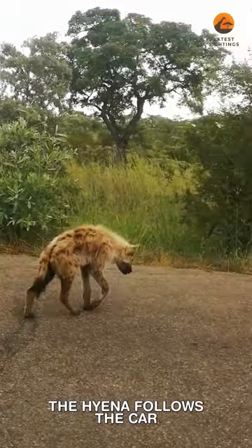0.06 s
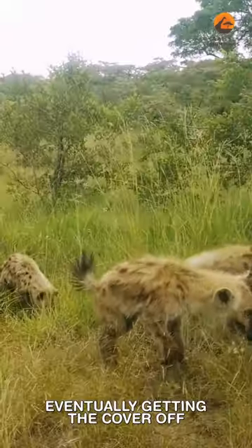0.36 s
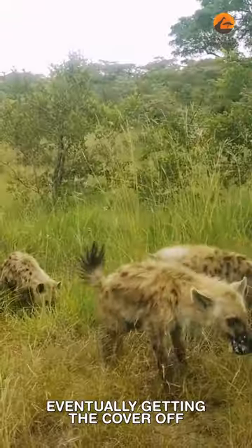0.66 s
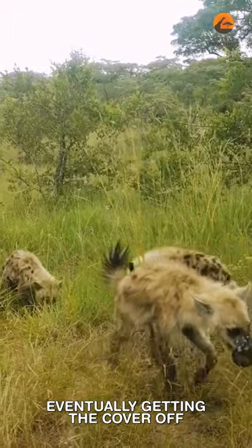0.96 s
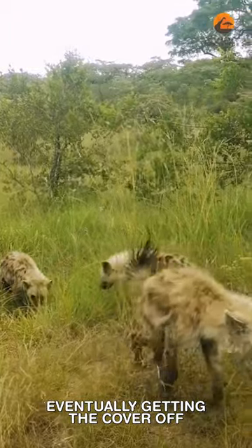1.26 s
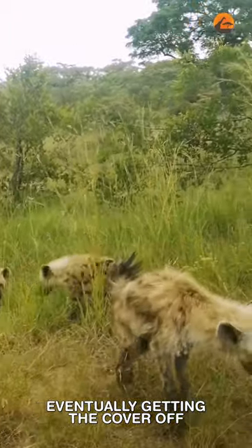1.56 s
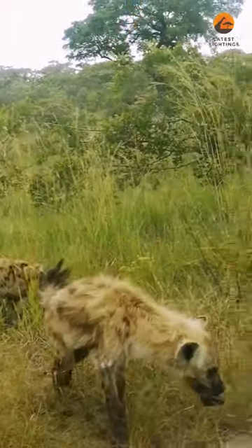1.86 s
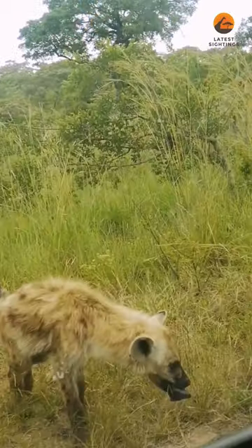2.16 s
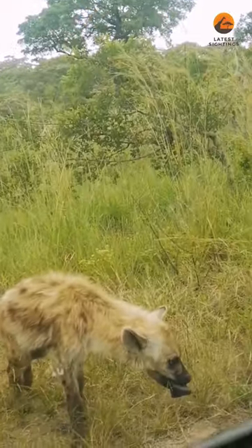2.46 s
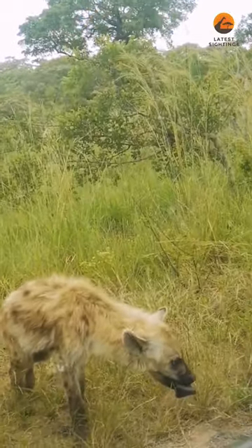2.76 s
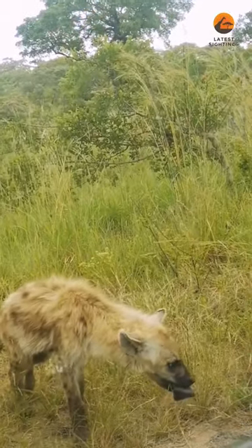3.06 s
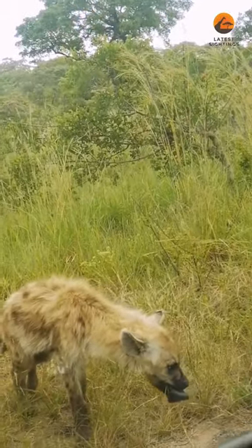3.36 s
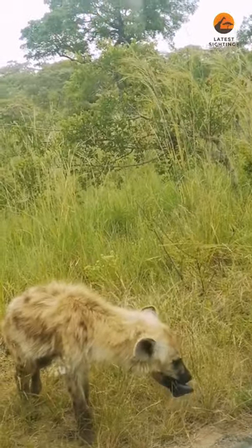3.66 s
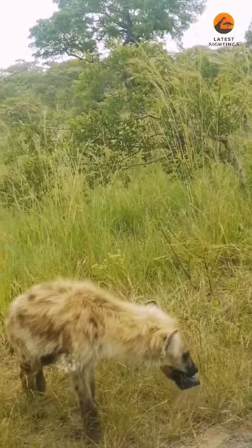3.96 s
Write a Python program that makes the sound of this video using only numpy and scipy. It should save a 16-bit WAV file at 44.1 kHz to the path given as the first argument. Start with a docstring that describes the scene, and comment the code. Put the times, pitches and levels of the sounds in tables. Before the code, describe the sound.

A long, high, raspy animal squeal comes from the left, heard from a car outdoors. It follows small bird chirps over a low idling throb and faint hiss, and a diesel engine gradually revs up beneath it.

```python
"""Two vehicles and a squeal in the bush

From a car, on a close-set stereo microphone: two engines idle and their booms beat, then one speeds up
and its diesel clatter grows. Out to the left, over far hiss and insects, small birds whistle, chatter
and scold. An unseen animal, perhaps a bird, gives one long shrill squeal, which turns hoarse as its
two voices split apart and flutter."""
import sys
import numpy as np
from scipy import signal
from scipy.fft import rfft, irfft
from scipy.io import wavfile

SR = 44100
rng = np.random.default_rng(int(sys.argv[2]) if len(sys.argv) > 2 else 0)


def master(y):
    """Save y as 16-bit WAV."""
    cut = np.clip(np.atleast_2d(y).T, -1, 1)
    pcm = np.round(cut * 32767)  # scale
    wavfile.write(sys.argv[1], SR, pcm.astype(np.int16))


N = 176400
T = np.arange(N) / SR
HZ = np.fft.rfftfreq(N, 1 / SR)

# likeness of the noise at the two microphone ports (frequency [Hz], correlation [0-1])
PORT_LIKENESS = [(250, .98), (1400, .65), (3000, .25)]
# its lean to the left (frequency [Hz], left minus right [dB])
PORT_BALANCE = [(100, 1.4), (300, 4.1), (700, 7.3), (4000, 0.93)]
# rumble and far hiss before the low cut (frequency [Hz], relative density [dB])
AIR_SPECTRUM = [(41, -32), (70, 6), (123, -19), (237, -20), (364, -28.5), (427, -26.5), (1030, -40),
                (1230, -36), (4900, -43), (13200, -58), (15500, -62)]
# lone hoarse chips (time [s], length [s], pitch [Hz], level before panning [dB])
LONE_CHIPS = [(0.848, 0.022, 3510, -30.5), (1.641, 0.058, 4250, -34), (3.76, .12, 9400, -40.5)]
# starts of a chattering bird's repeated phrase (time [s])
PHRASE_STARTS = [.891, 0.99, 1.076]
# chips of that phrase (delay [s], length [s], pitch [Hz], level before panning [dB])
PHRASE_CHIPS = [(0, 0.0044, 4060, -21.5), (.011, 0.0075, 4730, -17.5), (.023, .013, 4850, -33),
                (.05, 0.021, 3440, -28)]
# bird whistles (time [s], length [s], start pitch [Hz], end pitch [Hz], level before panning [dB])
BIRD_WHISTLES = [(0, 0.098, 2780, 3630, -39.5), (.065, .075, 2673, 2645, -35.5),
                 (.15, 0.071, 2665, 2566, -36), (.225, 0.13, 5770, 3790, -32),
                 (.205, 0.098, 2960, 3610, -42.5), (.31, 0.084, 2580, 2514, -42),
                 (.59, 0.11, 5170, 3620, -28), (.695, 0.15, 5780, 4230, -40), (.84, 0.11, 2770, 3320, -40),
                 (1.07, 0.082, 3050, 2790, -41.5), (1.1, .145, 5950, 4250, -40.5),
                 (1.41, 0.092, 6430, 4990, -42.5), (2.735, 0.055, 3630, 3230, -37.5),
                 (2.8, 0.042, 3300, 2575, -38.5), (3.12, 0.15, 3374, 3100, -39),
                 (3.715, .11, 8480, 8560, -40)]
# course of the squeal (time [s], pitch [Hz], roughness [0 = clean])
SQUEAL_PITCH = [(1.51, 5540, 0.62), (1.56, 5000, 1.3), (1.61, 4780, 0.72), (1.7, 4525, 1.07),
                (1.78, 4447, 0.39), (2.0, 4411, 0.27), (2.015, 3746, 0.68), (2.17, 4286, 0.72),
                (2.205, 4557, 0), (2.275, 4652, 0.22), (2.3, 4824, 0.57), (2.4, 4916, 0.61),
                (2.76, 4872, 0.59), (2.86, 4980, 0.44)]
# its harmonics' relative levels (time [s], first [dB], second [dB], third [dB])
SQUEAL_HARMONICS = [(1.51, -39, -66, -68), (1.56, -33, -49.5, -39), (1.73, -38.5, -49, -47.5),
                    (1.82, -28.5, -47.5, -49), (1.98, -33, -42, -48), (2.02, -40.5, -52, -54.5),
                    (2.16, -37.5, -49, -48), (2.22, -32.5, -37.5, -43), (2.31, -34.5, -32.5, -46),
                    (2.6, -31.5, -34, -42), (2.84, -29.5, -33, -42), (2.875, -61, -54, -62)]
# vehicle whines (time [s], length [s], start pitch [Hz], end pitch [Hz], level before panning [dB])
VEHICLE_WHINES = [(2.86, 0.28, 1582, 1582, -36.5), (3.12, 0.418, 529.5, 457.4, -39)]
# speed of the second engine (time [s], firing rate [Hz])
FIRING_RATE = [(0, 29), (.15, 30.4), (.6, 30.1), (.95, 29.2), (1.5, 28.65), (1.72, 29), (2.13, 34.4),
               (2.45, 35.7), (2.75, 36.5), (3.12, 38.3), (3.55, 39.1), (4, 41)]
# engine bay hiss before the low cut (frequency [Hz], relative density [dB])
BAY_SPECTRUM = [(200, -9), (360, -16.5), (600, -10), (1100, -6), (3000, -6), (4800, -10.5), (7300, -25),
                (13000, -21), (15500, -36)]
# gain of that hiss and the knocks, rising with load (time [s], gain [dB])
BAY_GAIN = [(0, -48), (1.3, -46), (2.1, -39.5), (3, -34.5), (4, -31.5)]
# parts rung by each cylinder (place in firing order [0-3], frequency [Hz], relative level [dB])
CYLINDER_RINGS = [(0, 700, 2), (0, 2000, -3), (2, 1480, 1), (2, 2720, -2), (3, 830, 5), (3, 1560, 0)]
# boom of the engine that stays at idle (multiple of firing rate [1], level [dB])
IDLE_PARTIALS = [(1, -33), (2, -16), (3, -48), (4, -47)]
# boom of the second engine as heard in the car (frequency [Hz], level of a partial there [dB])
BOOM_RESPONSE = [(30, -92), (35, -17.5), (39, -14.5), (58, -18), (69, -28), (77, -26.5), (87, -56),
                 (145, -34.5), (260, -54)]

PORT_LAG_S = .0001  # sound reaches the right port this much later
PORT_DELAY = np.exp(-2j * np.pi * HZ * PORT_LAG_S)


def amp(db):
    """Decibels to gain."""
    return 10 ** (np.asarray(db) / 20)


def unit(x):
    """Scales to rms 1."""
    return x / np.sqrt(np.mean(x ** 2) + 1e-20)


def curve(rows, column=1):
    """One column of a table, joined over time."""
    rows = np.array(rows)
    return np.interp(T, rows[:, 0], rows[:, column])


def spectrum(rows, hz):
    """A table's value at hz, joined over log frequency."""
    f, value = np.transpose(rows)
    return np.interp(np.log(hz + 1), np.log(f + 1), value)


def add(mix, s, sound):
    """Mixes a sound in at s seconds."""
    part = mix[round(s * SR):][:len(sound)]
    part += sound[:len(part)]


def band(hz, width_hz):
    """Noise in a bell-shaped band; centred on 0 Hz, a random waver."""
    bell = np.exp(-.5 * ((HZ - hz) / width_hz) ** 2)
    return unit(irfft(rfft(rng.standard_normal(N)) * bell, N))


def noise_pair(gain):
    """Coloured noise at the two microphone ports, most alike in the bass."""
    left, other = rfft(rng.standard_normal((2, N)))
    same = spectrum(PORT_LIKENESS, HZ)
    tilt = amp(spectrum(PORT_BALANCE, HZ) / 2)
    right = (same * left + np.sqrt(1 - same ** 2) * other) * PORT_DELAY
    pair = irfft(np.array([left * tilt, right / tilt]) * gain, N)
    return pair / np.sqrt(np.mean(pair.mean(0) ** 2))


def place(x, pan_db, wet_db, t60_s=.18, first_echo_s=.0012):
    """Sets a source left of the microphone, with scatter from the car and the bushes."""
    t = T[:SR // 2]
    echoes = rng.standard_normal((2, len(t))) * (rng.random((2, len(t))) < .05)
    tail = echoes * amp(-60 * t / t60_s) * (t > first_echo_s)
    tail /= np.linalg.norm(tail, axis=1, keepdims=True)
    wet = signal.fftconvolve(x[None], tail, axes=1)[:, :N]
    direct = np.array([x * amp(pan_db / 2), irfft(rfft(x) * PORT_DELAY, N) * amp(-pan_db / 2)])
    return direct + amp(wet_db) * wet


def glides(rows, jitter, fade_share=.17):
    """Near-pure tones that slide from one pitch to another."""
    out, waver = np.zeros(N), band(0, 116)
    for s, length, first, last, db in rows:
        u = np.linspace(0, 1, int(length * SR))
        hz = first * (last / first) ** u * (1 + jitter * np.roll(waver, -int(s * SR))[:len(u)])
        swell = np.sin(np.pi / 2 * np.minimum(np.minimum(u, 1 - u) / fade_share, 1))
        add(out, s, np.sqrt(2) * amp(db) * swell * np.sin(2 * np.pi * np.cumsum(hz) / SR))
    return out


def air(low_cut_hz=85):
    """Steady rumble, far hiss and a thin ring of insects on both sides."""
    colour = amp(spectrum(AIR_SPECTRUM, HZ)) / (1 + (low_cut_hz / (HZ + 1)) ** 6)
    bed = noise_pair(colour) * amp(-28 + .5 * band(0, 4.5))
    insects = np.array([band(12800, 550) for port in range(2)])
    return bed + amp(-56.5) * insects


def scold(start_s=.268, spacing_s=.03, syllable_s=.016, top_hz=7910):
    """A bird's dry scold: a quick run of toneless, hissing syllables."""
    level, syllable = np.zeros(N), np.hanning(int(syllable_s * SR)) ** .5
    for k in range(8):
        add(level, start_s + k * spacing_s, amp(-29.5 + rng.standard_normal()) * syllable)
    hiss = band(7400, 2150) + .63 * band(3400, 720)
    hiss = unit(irfft(rfft(hiss) * (HZ < top_hz), N))
    return place(level * hiss, pan_db=5.5, wet_db=0)


def whistles():
    """Small birds whistle sliding notes, well to the left."""
    return place(glides(BIRD_WHISTLES, jitter=.0065), pan_db=12, wet_db=-2)


def chatter(rasp_hz=258):
    """Bird chips, alone and in quick runs, made hoarse by a fast pitch flutter."""
    out, rasp = np.zeros(N), band(0, 630)
    runs = [(start + delay, *chip) for start in PHRASE_STARTS for delay, *chip in PHRASE_CHIPS]
    for s, length, hz, db in LONE_CHIPS + runs:
        pitch = hz + rasp_hz * rasp[int(s * SR):][:int(length * SR)]
        swell = np.hanning(len(pitch)) ** .5
        add(out, s, np.sqrt(2) * amp(db) * swell * np.sin(2 * np.pi * np.cumsum(pitch) / SR))
    return place(out, pan_db=5, wet_db=-7)


def squeal(split=.048):
    """Off to the left, two shrill voices from one throat part and flutter where the squeal is hoarse."""
    rough, out = curve(SQUEAL_PITCH, column=2), np.zeros(N)
    for offset, gain in [(.22 * split, 1), (-split, amp(-3) * rough)]:
        flutter = .017 * band(330, 107) + .019 * band(0, 40)
        turns = np.cumsum(curve(SQUEAL_PITCH) * (1 + rough * (offset + flutter))) / SR
        voice = sum(amp(curve(SQUEAL_HARMONICS, k)) * np.sin(2 * np.pi * k * turns) for k in (1, 2, 3))
        out += gain * voice * amp(2 * band(0, 85))
    sounding = (T > SQUEAL_HARMONICS[0][0]) & (T < SQUEAL_HARMONICS[-1][0])
    return place(amp(1.5) * out * sounding, pan_db=10.5, wet_db=4)


def whines():
    """Faint, wavering whines from the moving vehicle."""
    return place(glides(VEHICLE_WHINES, jitter=.03), pan_db=4, wet_db=-8)


def diesel_knocks(rise_s=.004, phase_turns=.35):
    """Three of four cylinders ring their own parts as they fire, harder as the engine speeds up."""
    rate = curve(FIRING_RATE)
    firing = (np.cumsum(rate) / SR + phase_turns).astype(int)
    t, knocks = T[:SR // 20], np.zeros(N)
    envelope = t / rise_s * np.exp(1 - t / rise_s)
    for cylinder, hz, db in CYLINDER_RINGS:
        for at in np.flatnonzero((np.diff(firing) > 0) & (firing[1:] % 4 == cylinder)):
            size, detune = rng.standard_normal(2)
            ring = np.sin(2 * np.pi * (hz + 20 * detune) * t)
            add(knocks, at / SR, amp(db + 2 * size) * envelope * ring)
    force = np.clip((rate - rate[0]) / 10, 0, 1)
    return place(knocks * force, pan_db=7.8, wet_db=-11)


def engine_bay(low_cut_hz=208, drone_start_s=3.23, drone_rise_s=.62):
    """Hiss and diesel clatter grow with the load; a low drone swells as the engine pulls."""
    colour = amp(spectrum(BAY_SPECTRUM, HZ)) / (1 + (low_cut_hz / (HZ + 1)) ** 2)
    hiss = noise_pair(colour) * amp(2 + .5 * band(0, 60))
    swell = np.clip((T - drone_start_s) / drone_rise_s, 0, 1)
    drone = amp(-34) * swell * band(260, 96)
    return amp(curve(BAY_GAIN)) * (hiss + diesel_knocks()) + drone


def booms(idle_hz=26.8, port_phase_rad=.24):
    """Heard in the car, the engines' low partials beat; the second adds a hum that grows with load."""
    side = np.array([[1], [-1]])
    phase = port_phase_rad * side
    idle = sum(amp(db) * np.cos(2 * np.pi * k * idle_hz * T + phase) for k, db in IDLE_PARTIALS)
    rate = curve(FIRING_RATE)
    turns = np.cumsum(rate) / SR
    revving = np.zeros((2, N))
    for k in range(1, 6):
        waver = 1 + .019 * k * band(0, 7.4)
        revving += amp(spectrum(BOOM_RESPONSE, k * rate)) * waver * np.cos(2 * np.pi * k * turns + phase)
    hum = unit(sum(np.cos(2 * np.pi * (k * turns + rng.random())) / k for k in range(4, 20)))
    load_db = curve(BAY_GAIN) - BAY_GAIN[0][1]
    return (idle + revving + amp(-39 + .15 * load_db) * hum) * amp(.5 * side)


def scene():
    """Birds, vehicles, bush air and the squeal as they reach the microphone."""
    birds = whistles() + chatter() + scold()
    return birds + whines() + booms() + air() + engine_bay() + squeal()


def record(dry, cutoff_hz=15750):
    """The recorder's band limit cuts the highest treble."""
    low_pass = signal.firwin(511, cutoff_hz, window=("kaiser", 9), fs=SR)
    return signal.oaconvolve(dry, low_pass[None], "same")


dry = scene()
out = record(dry)
master(out)
```